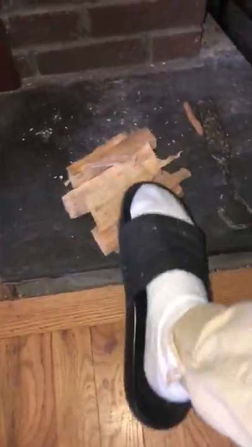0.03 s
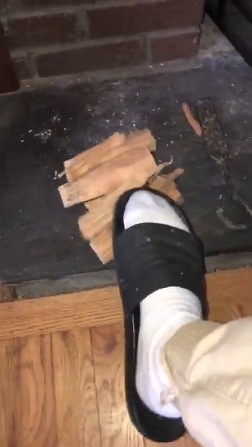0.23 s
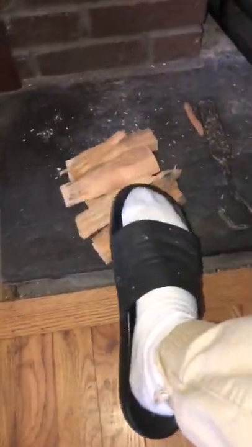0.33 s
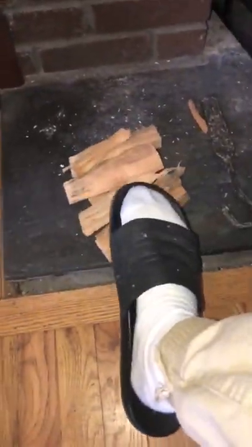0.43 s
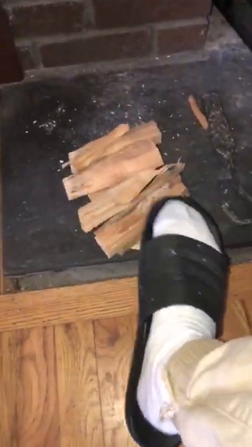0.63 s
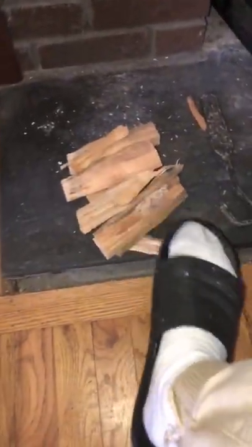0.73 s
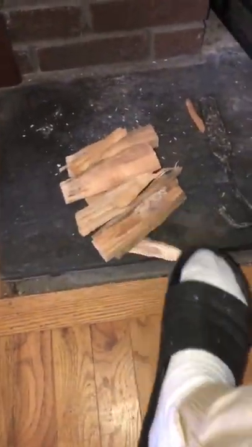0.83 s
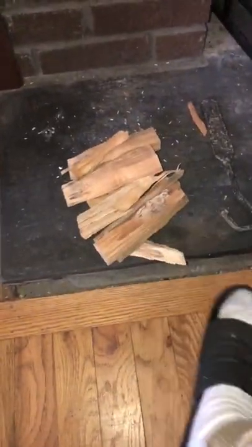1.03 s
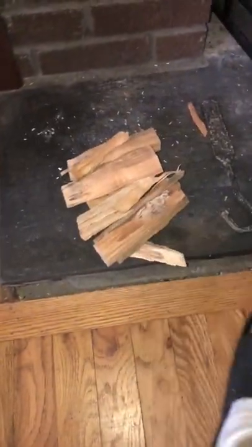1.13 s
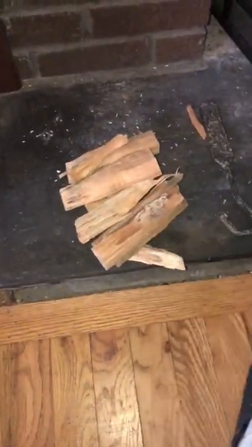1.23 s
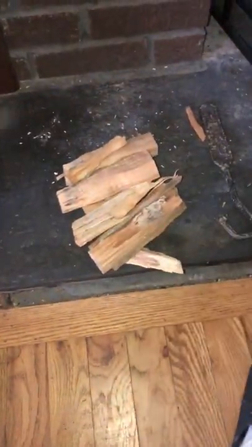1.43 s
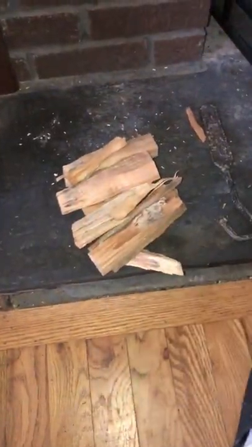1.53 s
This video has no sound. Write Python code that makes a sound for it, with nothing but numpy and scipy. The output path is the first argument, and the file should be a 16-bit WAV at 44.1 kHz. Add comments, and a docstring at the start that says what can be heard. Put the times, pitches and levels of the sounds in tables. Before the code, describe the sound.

A short clatter of dry kindling as a foot drags off it, then a soft step.

```python
"""Dry kindling clatters on a hearth as a slipper drags off the pile. The sticks scrape and tick under the sole,
then tip and knock on each other and on the hearth: each knock rings one stick, jolts the pile and thuds the
hearth. A second later a trouser leg swishes, and the slipper scuffs the floor and is set down softly. It all
rings briefly in a small room, over a bed of quiet room tone."""
import sys
import numpy as np
from scipy import signal
from scipy.fft import rfft, irfft, next_fast_len
from scipy.io import wavfile

SR = 44100
rng = np.random.default_rng(int(sys.argv[2]) if len(sys.argv) > 2 else 0)


def unload_wav(signal):
    """Save mono or channel-first audio to the path in sys.argv[1] as 16-bit WAV at rate SR, clipped to [-1, 1]."""
    wavfile.write(
        sys.argv[1],
        SR,
        np.round(np.clip(np.atleast_2d(signal).T, -1, 1) * 32767).astype(np.int16),
    )


N = 70560

# Knocks of the sticks, on each other and on the hearth: t/s, stick, ring level/dB, pile level/dB, crack
# level/dB, attack/s
KNOCKS = [ (0.079, "flat", -47.5, -46, -45.5, 0.0017), (0.092, "flat", -57.5, -59.5, -52.5, .001),
          (.148, "slim", -30, -59, -48, .001), (.161, "slim", -45.5, -55.5, -53, .001),
          (0.2016, "short", -23.5, -42, -34, 0.00014), (.217, "short", -41, -55, -45, .0005),
          (0.2357, "thin", -33.5, -48, -43.5, .002), (0.2552, "long", -26.5, -26.5, -30, 0.00099),
          (0.2754, "long", -21.5, -18.5, -31, .0004), (0.2776, "long", -29, -24, -28, 0.0005),
          (0.2981, "long", -16, -35.5, -26, 0.00062), (0.3239, "flat", -28.5, -42.5, -35.5, .0015), ]
# Bending modes of each stick, by name: f/Hz, level/dB, t60/s
STICK_MODES = { "slim": [(1250, -15, 0.018), (1995, -6, 0.035), (2922, 1, 0.018), (3204, -5, 0.027),
               (3970, -6, 0.021), (4280, -11.5, 0.035), (6300, -23, 0.0308)], "short": [(2010, -4.5, 0.036),
               (2122, -3.5, 0.026), (2520, -9, 0.04), (2798, 0, 0.031), (4073, -12, 0.0098),
               (4730, -15, 0.033), (5150, -13.5, .025), (7200, -17, 0.026)], "thin": [(1784, -4.5, .055),
               (2250, -9, 0.047), (3690, 2, 0.024), (4000, -5, .03), (6950, -11.5, .03)],
               "long": [(1630, -1.5, 0.054), (1487, -5.5, .035), (1334, -9, .03), (2355, -15, 0.041),
               (2788, -18.5, .045), (3868, -14, 0.054), (4240, -16.5, 0.029), (6930, -15, .035),
               (7380, -21.5, 0.029)], "flat": [(1560, -1, 0.031), (2246, 2.5, 0.042), (2430, -5, 0.059),
               (3696, -9.5, .03), (4496, -1, .028), (6200, -7, 0.018), (7090, -12, .04)], }
# Modes of the whole pile, jolted against the hearth: f/Hz, level/dB, t60/s
PILE_MODES = [(730, -11, .03), (920, -5, 0.033), (1048, -13, 0.044), (1240, -5, .025), (1393, -2.5, 0.03),
              (1648, 8.5, 0.016), (1902, -4, .022), (2090, 5, 0.017), (2170, -5, .03)]
# Dull thud of the hearth: f/Hz, level/dB
HEARTH_EQ = [(80, -31), (160, -11), (225, -12), (275, 5), (340, -18), (410, -2), (540, -5.5), (650, -7),
             (1000, -25.5), (3000, -59)]
# Dry crack of wood on wood: f/Hz, level/dB
CRACK_EQ = [(150, -48), (500, -28.5), (1200, -10), (2200, 4), (3100, 1), (4100, 6.5), (5500, -6),
            (7000, -0.5), (9000, -6.5), (10500, -6.5), (12000, -11.5), (14500, -14.5), (16000, -17.5)]
# Splinters catching and letting go: t/s, level/dB, f/Hz, bandwidth/Hz, t60/s
TICKS = [ (.0005, -43.5, 4220, 300, 0.061), (.0055, -37, 5840, 1200, 0.02),
         (.0148, -44.5, 7100, 900, 0.037), (0.02, -42.5, 7400, 400, 0.037), (0.0789, -43, 8450, 600, 0.045),
         (0.091, -44.5, 14800, 1500, 0.028), (.1119, -44, 9790, 200, 0.083),
         (0.1115, -34.5, 14230, 2000, .014), (.1119, -37.5, 5415, 900, 0.0092),
         (.1225, -51, 9700, 300, 0.018), (.1865, -45, 14800, 1800, .02), (.215, -43, 14300, 2000, .025),
         (0.2332, -37, 14040, 2000, 0.015), (.257, -31, 15100, 1500, 0.015), (0.276, -24, 9230, 300, .02),
         (.279, -33, 11700, 800, 0.017), (0.321, -40.5, 8240, 500, 0.032), ]
# Bright splash on each tick: f/Hz, level/dB
SPLINTER_EQ = [(300, -44.5), (1500, -14), (4000, -8), (5300, 5), (7000, 0), (9000, -1), (11500, 0),
               (14500, -4), (16000, -1.5)]
# Envelope of the sole dragging the sticks: t/s, level/dB
DRAG_ENV = [(0, -49), (.035, -50.5), (.07, -49), (.1, -49), (.138, -52.5), (.18, -47.5), (.23, -48),
            (.27, -53), (0.321, -42), (.36, -66), (.42, -100)]
# Rasp of that drag: f/Hz, level/dB
DRAG_EQ = [(59, -20.5), (100, 3), (260, -4), (950, -8.5), (1800, -5), (2270, -1), (2750, -10), (3940, -10),
           (4470, -15), (5300, -7.5), (6150, -13), (9820, -12.5), (12100, -20.5), (14700, -13.5),
           (16000, -24)]
# Soft blows of the sole: t/s, thump level/dB, tap level/dB, thump f/Hz
STEPS = [(.001, -40.5, -44.5, 177), (0.165, -46, -47, 269.4), (1.175, -46.5, -57, 326.4),
         (1.2596, -42.5, -45, 266)]
# Dull tap of the sole: f/Hz, level/dB
TAP_EQ = [(60, -14), (150, -3), (300, 3), (500, 2), (700, -4.5), (950, -7), (1300, -3), (1750, -2.5),
          (2300, -25.5), (4300, -11.5), (7000, -40.5), (15000, -31)]
# Envelope of the slipper sliding on the floor: t/s, level/dB
SCUFF_ENV = [(1.165, -92.5), (1.177, -62.5), (1.22, -58.5), (1.258, -61.5), (1.275, -70), (1.299, -85)]
# Colour of that slide: f/Hz, level/dB
SCUFF_EQ = [(240, -22.5), (400, -4), (598, -6), (697, -22), (839, -5), (1490, -7.5), (1990, -6.5),
            (3310, -8), (6150, -9), (16000, -30.5)]
# Envelope of the trouser cloth as the leg swings: t/s, level/dB
CLOTH_ENV = [(.98, -95), (1.06, -84), (1.1, -74.5), (1.14, -82), (1.2, -100), (1.54, -100), (1.585, -80.5),
             (1.6, -72.5)]
# Airy colour of the cloth: f/Hz, level/dB
CLOTH_EQ = [(300, -10.5), (2000, -2), (4500, 0), (9000, -2.5), (14500, 0), (16000, -4)]
# Decay time of the room: f/Hz, t60/s
ROOM_DECAY = [(150, .45), (500, .45), (1700, 0.56), (3800, .58), (7000, 0.39), (10000, .3), (15000, .22)]
# Colour of the reverb tail: f/Hz, level/dB
ROOM_EQ = [(100, 4.5), (300, 9.5), (700, -1), (1100, -1), (1450, -4.5), (1750, -2.5), (2200, -3),
           (3200, -2.5), (3600, 4.5), (3750, 5.5), (3950, -3.5), (4400, -2), (5500, 1), (7000, -2.5),
           (8500, -6.5), (15000, -5)]
# Low hum of the room tone: f/Hz, level/dB
HUM_EQ = [(15, -33), (25, -14.5), (55, -2), (92, -4), (123, -1), (190, -4), (223, -6.5), (439, -10.5),
          (607, -21.5), (677, -19.5), (734, -20), (796, -21), (2050, -30), (7710, -36.5), (8830, -33),
          (10100, -40), (16000, -39.5)]

STICK_CUT_HZ, PILE_CUT_HZ = 875, 820  # small bodies radiate no bass
MODE_SCATTER_DB, CONTACT_S = 1.45, 0.0008
SLIP_COUNT, SLIP_SPREAD_DB = 7000, 3.5  # friction grains, spread over the whole scene
SLIP_LOW_HZ, SLIP_HIGH_HZ, SLIP_T60_S = 900, 15750, 0.012
TAIL_DB, TAIL_BUILD_S = -17, 0.0092
EARLY_DB, EARLY_SPAN_S = -22, (0.0022, 0.016)
HUM_DB, HISS_DB = -59.5, -86.5
TOP_HZ = 16000


def clatter():
    """Each knock rings one stick, jolts the pile and the hearth, and bites with a dry crack."""
    out, t = np.zeros(N), np.arange(SR // 6) / SR
    for start, stick, ring_db, pile_db, crack_db, attack in KNOCKS:
        tone = highpass(ring(STICK_MODES[stick], t, attack), STICK_CUT_HZ)
        thud = amp(-12) * burst(noise(HEARTH_EQ, len(t)), t, t60=0.059, attack=0.0015)
        jolt = highpass(ring(PILE_MODES, t, attack), PILE_CUT_HZ) + thud
        crack = burst(noise(CRACK_EQ, len(t)), t, t60=0.036, attack=attack)
        add(out, start, amp(ring_db) * tone + amp(pile_db) * jolt + amp(crack_db) * crack)
    return out


def ring(modes, t, attack):
    """A struck body: damped modes, each set off at a slightly different instant of the contact."""
    out = np.zeros(len(t))
    for hz, db, t60 in modes:
        age = np.maximum(t - CONTACT_S * rng.random(), 0)
        gain = amp(db + MODE_SCATTER_DB * rng.normal())
        out += gain * ping(hz, age, t60)
    return out * fade_in(t, attack)


def splinters():
    """Splinters catch and let go: bright ticks, each a rough resonance with a splash of noise."""
    out, t = np.zeros(N), np.arange(SR // 10) / SR
    for start, db, hz, width_hz, t60 in TICKS:
        tick = narrow_noise(hz, width_hz, len(t)) + amp(-2) * noise(SPLINTER_EQ, len(t))
        add(out, start, amp(db) * burst(tick, t, t60, attack=0.00025))
    return out


def drag():
    """The sole drags across the sticks with a grainy rasp."""
    return friction(DRAG_EQ, DRAG_ENV, rub_gain=0.8)


def friction(eq, stroke, rub_gain):
    """Tiny slips of uneven size, each ringing a fibre for a moment, over a smooth rub."""
    slips, t = np.zeros(N), np.arange(SR // 50) / SR
    for when, pitch, size in rng.random((SLIP_COUNT, 3)):
        hz = SLIP_LOW_HZ + pitch * (SLIP_HIGH_HZ - SLIP_LOW_HZ)
        db = -SLIP_SPREAD_DB * np.log(max(size, 0.02))  # many soft grains, a few loud ones
        add(slips, when * N / SR, amp(db) * ping(hz, t, SLIP_T60_S))
    bass_gain = np.hypot(1, rub_gain)  # the bass is all rub
    rub = filtered(rng.standard_normal(N), lambda f: np.where(f < SLIP_LOW_HZ, bass_gain, rub_gain))
    return envelope(stroke) * coloured(unit(slips) + rub, eq)


def scuff():
    """The slipper slides on the floor, brightest where it is fastest."""
    speed = envelope(SCUFF_ENV) / envelope(SCUFF_ENV).max()
    fizz = highpass(friction(SCUFF_EQ, SCUFF_ENV, rub_gain=1.9), hz=9370)
    body = friction(SCUFF_EQ, SCUFF_ENV, rub_gain=1.9)
    return body + amp(7) * speed ** 3.8 * fizz


def steps():
    """The sole lands with a low thump and a dull tap."""
    out, t = np.zeros(N), np.arange(SR // 6) / SR
    for start, thump_db, tap_db, hz in STEPS:
        thump = ring([(hz, 0, 0.073)], t, attack=0.002)  # one mode, t60 of 73 ms
        tap = burst(noise(TAP_EQ, len(t)), t, t60=0.034, attack=0.00016)
        add(out, start, amp(thump_db) * thump + amp(tap_db) * tap)
    return out


def cloth():
    """Trouser fabric gives a faint, smooth swish as the leg swings."""
    return envelope(CLOTH_ENV) * noise(CLOTH_EQ, N)


def reverb(x):
    """Early reflections off hearth and bricks, then a diffuse tail whose top end dies first."""
    hz, t, spectrum = signal.stft(rng.standard_normal(SR), SR, nperseg=256)
    decay_db = -60 * t / curve(ROOM_DECAY, hz)[:, None]
    colour_db = curve(ROOM_EQ, hz)[:, None]
    _, tail = signal.istft(spectrum * amp(decay_db + colour_db), SR, nperseg=256)
    tail *= fade_in(np.arange(len(tail)) / SR, TAIL_BUILD_S)
    echo_gains = rng.standard_normal(12)
    echo_delays = (SR * rng.uniform(*EARLY_SPAN_S, size=12)).astype(int)
    early = np.zeros(len(tail))
    early[echo_delays] = echo_gains
    impulse = amp(TAIL_DB) * tail / np.linalg.norm(tail) + amp(EARLY_DB) * early / np.linalg.norm(early)
    return signal.fftconvolve(x, impulse)[:N]


def room_tone():
    """The background bed: a low hum and a faint, narrow hiss."""
    return amp(HUM_DB) * noise(HUM_EQ, N) + amp(HISS_DB) * narrow_noise(hz=8970, width_hz=450, size=N)


def amp(db):
    """Decibels to gain."""
    return 10 ** (np.asarray(db) / 20)


def unit(x):
    """Normalise to rms 1."""
    return x / np.sqrt(np.mean(x ** 2) + 1e-20)


def curve(points, hz):
    """Read (f/Hz, value) breakpoints on a log frequency axis."""
    f, values = np.transpose(points)
    return np.interp(np.log(hz + 1), np.log(f + 1), values)


def envelope(points):
    """Gain per sample from (t/s, level/dB) breakpoints."""
    times, db = np.transpose(points)
    return amp(np.interp(np.arange(N) / SR, times, db, right=-120))


def fade_in(t, attack):
    """Exponential rise towards full level."""
    return 1 - np.exp(-t / attack)


def ping(hz, t, t60):
    """A sine that dies away by 60 dB in t60 seconds."""
    return amp(-60 * t / t60) * np.sin(2 * np.pi * hz * t)


def burst(x, t, t60, attack):
    """Shape noise into a hit that carries the energy of its attack-decay envelope."""
    env = amp(-60 * t / t60) * fade_in(t, attack)
    return unit(x * env) * np.sqrt(np.mean(env ** 2))


def filtered(x, response):
    """Zero-phase filter with gain response(f)."""
    size = next_fast_len(len(x) + 8192)
    return irfft(rfft(x, size) * response(np.fft.rfftfreq(size, 1 / SR)), size)[:len(x)]


def highpass(x, hz):
    """Causal low cut, 18 dB per octave."""
    return signal.sosfilt(signal.butter(3, hz, "highpass", fs=SR, output="sos"), x)


def coloured(x, eq):
    """Apply an EQ curve and normalise to rms 1."""
    return unit(filtered(x, lambda f: amp(curve(eq, f))))


def noise(eq, size):
    """Coloured noise, rms 1."""
    return coloured(rng.standard_normal(size), eq)


def narrow_noise(hz, width_hz, size):
    """Noise in one resonance, rms 1."""
    return unit(filtered(rng.standard_normal(size), lambda f: 1 / (1 + (2 * (f - hz) / width_hz) ** 2)))


def add(out, start, x):
    """Mix x in at start seconds."""
    part = out[round(start * SR):][:len(x)]
    part += x[:len(part)]


def scene():
    """Mono mix of kindling, slipper and cloth with their reverb, over the room tone."""
    foley = clatter() + splinters() + drag() + scuff() + steps() + cloth()
    return (foley + reverb(foley) + room_tone())[None]


def record(dry):
    """The microphone's band limit: a steep high cut, 300 Hz wide."""
    return filtered(dry[0], lambda f: np.clip((TOP_HZ - f) / 300 + 0.5, 0, 1))[None]


dry = scene()
out = record(dry)
unload_wav(out)
```